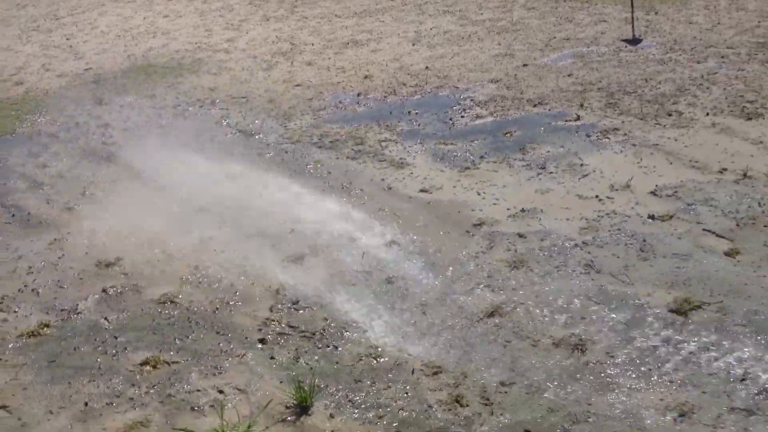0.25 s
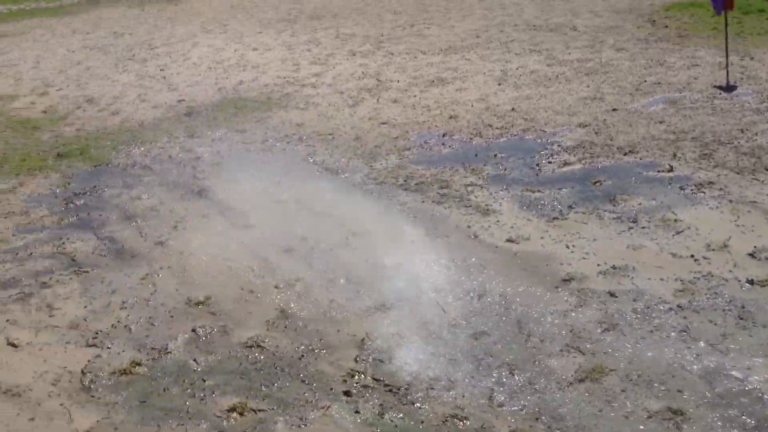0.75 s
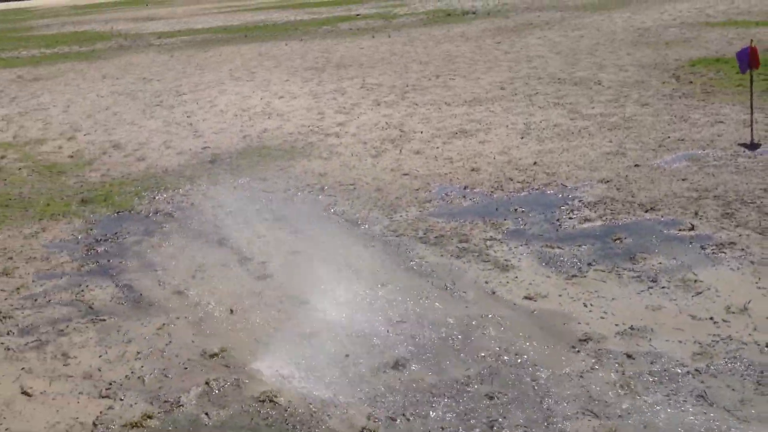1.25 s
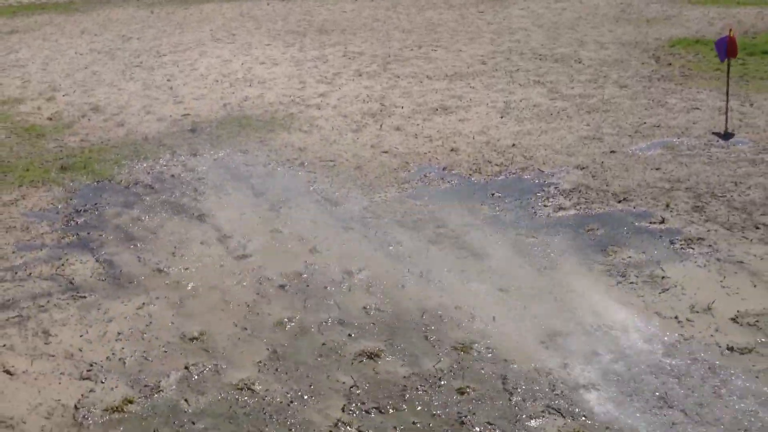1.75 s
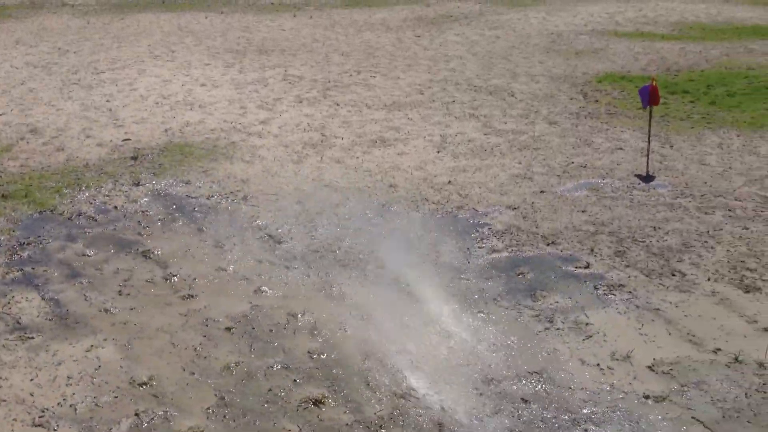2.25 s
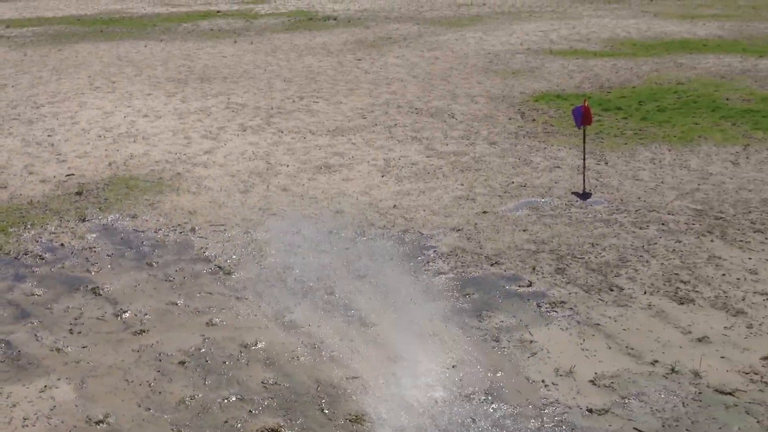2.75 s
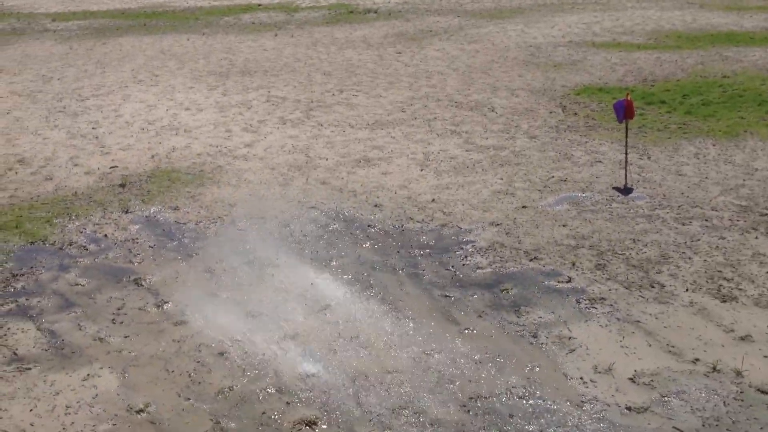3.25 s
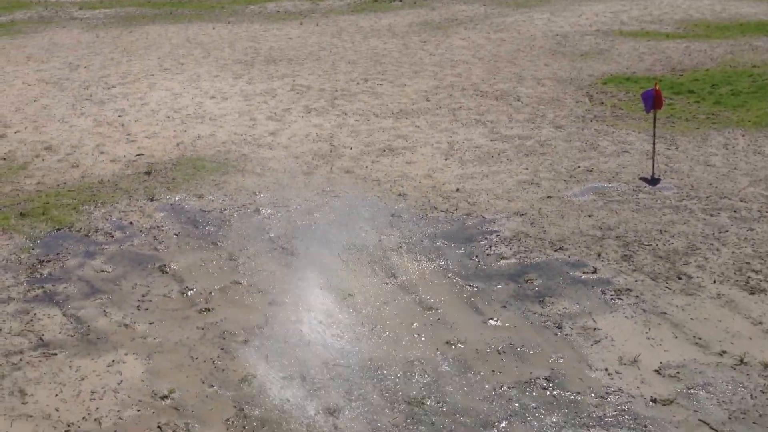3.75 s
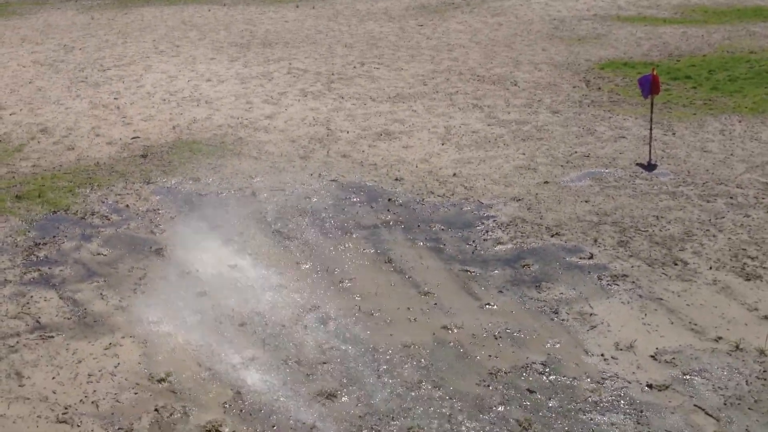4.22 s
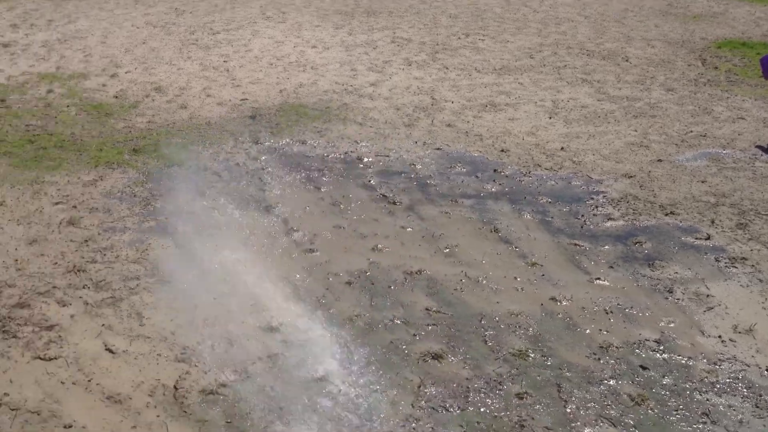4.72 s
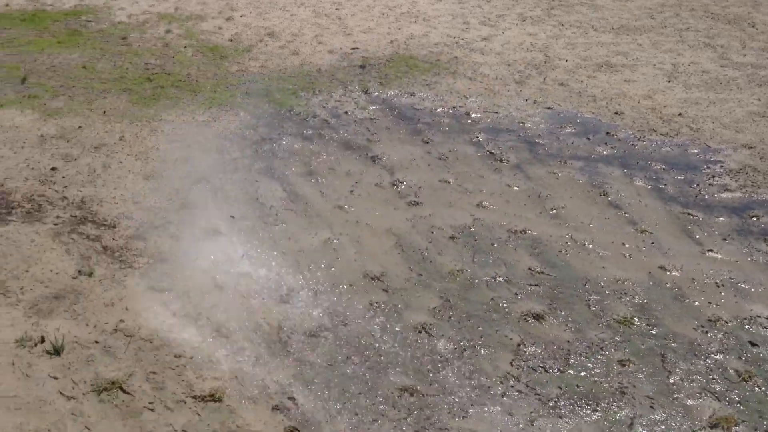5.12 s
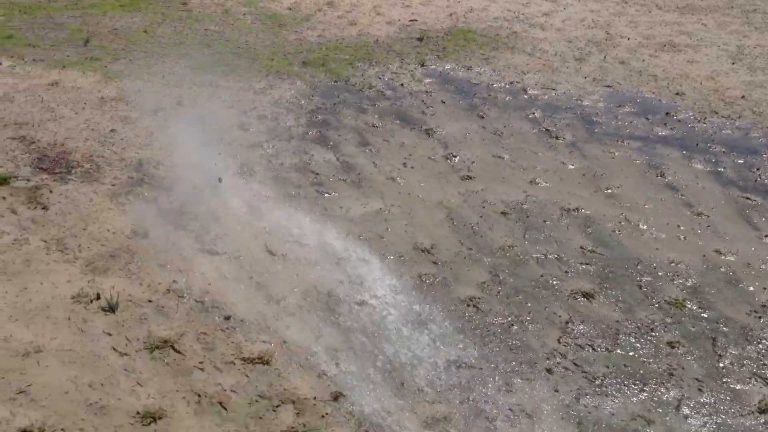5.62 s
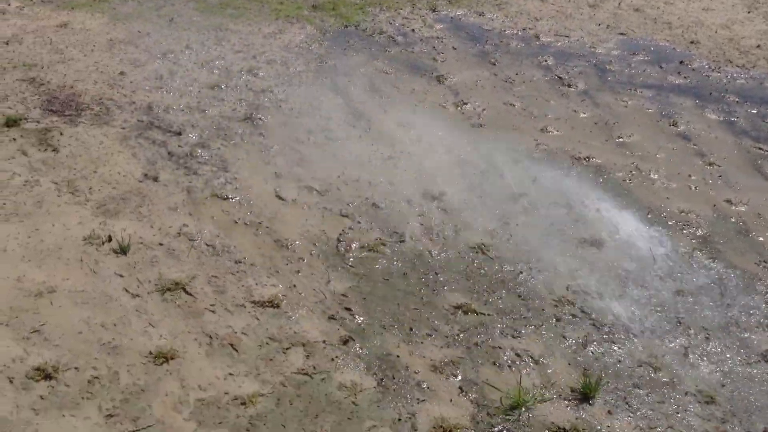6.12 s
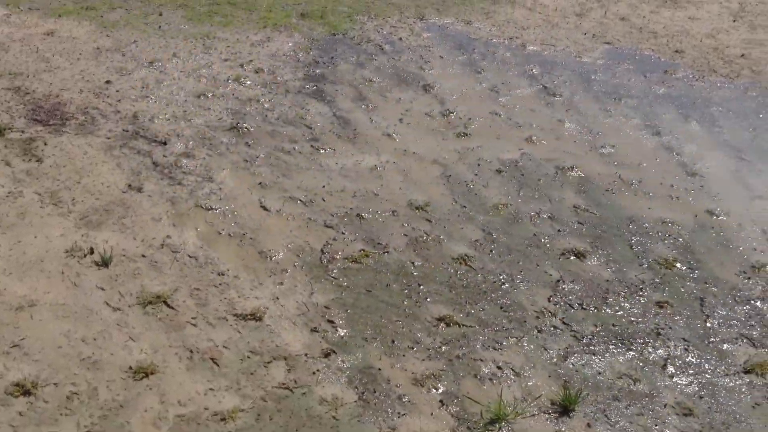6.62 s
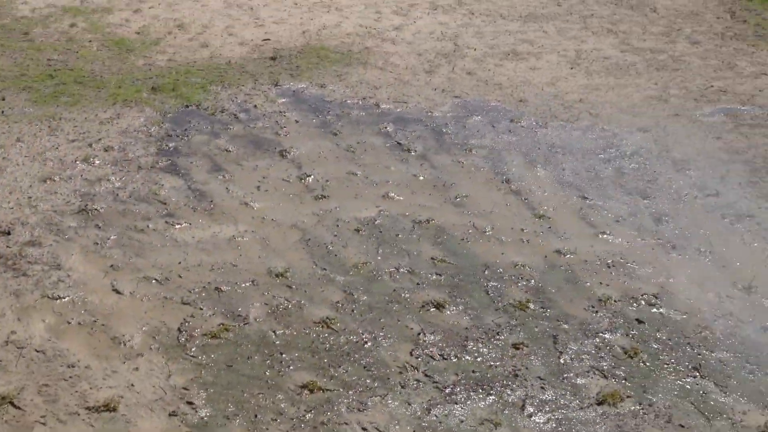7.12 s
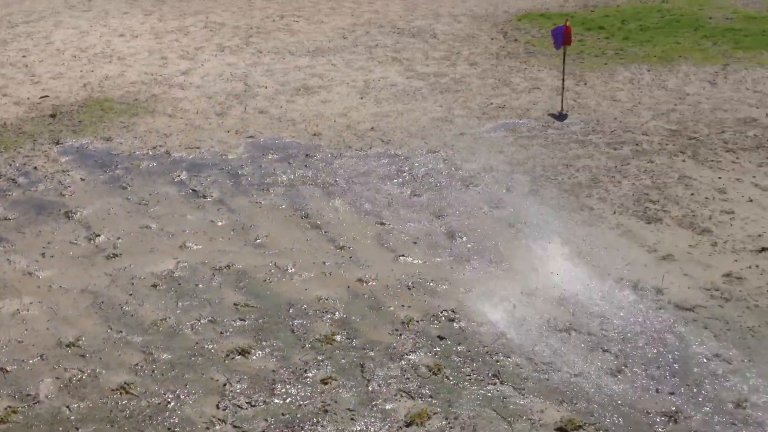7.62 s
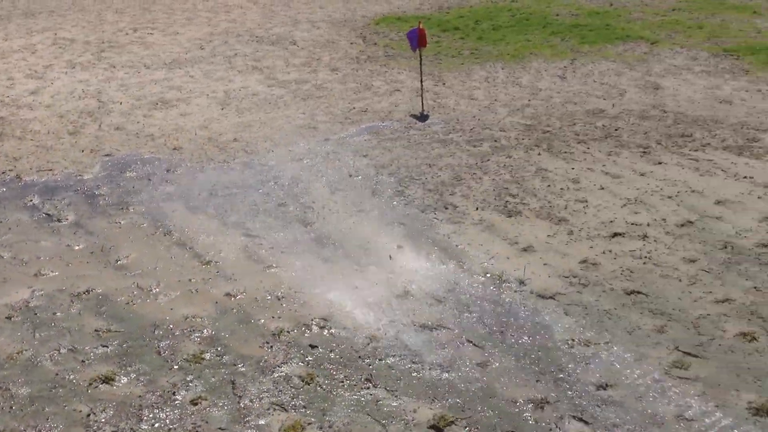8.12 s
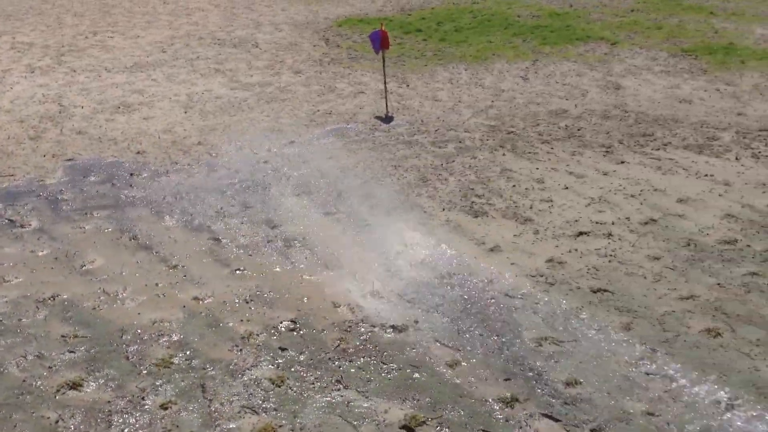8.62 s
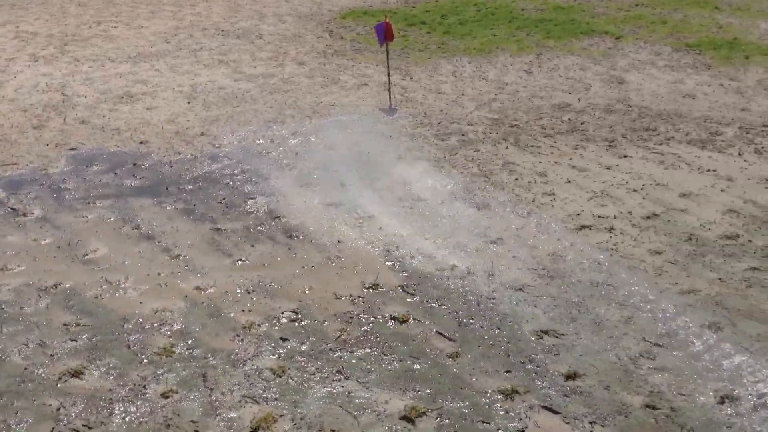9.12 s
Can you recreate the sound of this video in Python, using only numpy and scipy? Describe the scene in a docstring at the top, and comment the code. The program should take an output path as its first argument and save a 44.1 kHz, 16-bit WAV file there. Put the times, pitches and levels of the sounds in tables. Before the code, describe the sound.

A hand-swept air jet blasts sand off the ground with a throbbing, gritty hiss while wind thumps on the microphone.

```python
"""Jet blasting rough ground

A fast jet, swept by hand in front of a small camera, blasts sand and spray off the ground. Its gritty hiss
throbs a few times a second and changes colour with its bearing from the microphone. A steadier low rush
of air lies under it, and right at the microphone a breeze buffets the port with dull thumps."""
import sys
import numpy as np
from scipy import signal
from scipy.fft import rfft, irfft, next_fast_len
from scipy.io import wavfile
from scipy.ndimage import uniform_filter1d, map_coordinates

SR = 44100
rng = np.random.default_rng(int(sys.argv[2]) if len(sys.argv) > 2 else 0)


def materialize(psi):
    """Save the field psi as 16-bit PCM at rate SR to the path in sys.argv[1].

    A 1-D psi becomes a single channel; in a 2-D psi each row is a channel.
    """
    bounded = np.clip(np.atleast_2d(psi).T, -1, 1)
    quanta = np.round(bounded * 32767).astype(np.int16)
    wavfile.write(sys.argv[1], SR, quanta)


N = 412776

# The jet between surges; fizz is its treble, body its mid-range.
# Each row: time in seconds, fizz level in dB, body over fizz in dB.
JET_LEVELS = [(0, -30.5, -6.5), (0.82, -30.5, -9), (1.39, -32.5, -10.5), (1.57, -27.5, -7),
              (2.04, -28.5, -9.5), (2.89, -31.0, -10.5), (4.64, -29.5, -9), (5.63, -34.5, -10),
              (5.84, -27, -5.5), (6.43, -32.5, -8.3), (6.63, -28, -8), (6.99, -28.5, -12.5),
              (7.24, -25.4, -12.5), (7.55, -28.5, -14.5), (7.64, -28.5, -9.0), (8.46, -30, -10.5),
              (9.36, -30.4, -8.5)]
# Throbs of the flow, often a quarter second apart.
# Each row: peak time in seconds, fizz rise in dB, body rise over fizz rise in dB.
JET_SURGES = [(0.122, 5, -3), (0.345, 5.5, -2.5), (0.579, 4.9, -2.4), (0.771, 3.5, -0.8),
              (0.994, 4.2, -0.5), (1.231, 5.5, 0.5), (1.436, 6.2, -1), (1.692, 1, -1), (2.448, 1, -1.5),
              (2.769, 3, -0.7), (3.433, 1.7, 0.7), (4.141, 1, -2.5), (4.345, 1, -0.4), (4.791, 3.5, 1.9),
              (5.046, 4, 0.2), (5.26, 3.5, 1.5), (5.473, 5.3, 0.5), (5.691, 4.2, 2), (5.92, 1.5, -4),
              (6.536, 4.5, -2.3), (6.844, 3, -0.2), (7.106, 5, 1), (7.359, 3, -0.5), (7.503, 4.8, 6),
              (7.854, 3.5, 0), (8.092, 4.5, -0.5), (8.301, 2.2, 1), (8.592, 3.5, 1.6), (9.295, 1.5, 0.5)]
# Where the jet strikes. Each row: time in seconds, bearing from the microphone (-1 left, 0 ahead, 1 right).
JET_BEARING = [(0, -.8), (.4, -1), (1.25, -1.35), (1.5, .17), (1.8, 0.64), (2.2, 0.4), (3.3, .15),
               (4.2, .17), (5.1, -0.13), (5.45, -0.36), (6, 0.31), (6.65, 0.91), (7.45, 0.89), (7.8, .12),
               (8.7, 0.059), (9.36, 0.35)]
# The jet's tone at the microphone. Each row: frequency in Hz, relative dB from the left, ahead, the right.
JET_COLOUR = [(700, -6, -3.5, -6), (1270, -10.5, -9, -15.5), (2240, -6, -5, -7.5), (2950, -5, -6, -9.5),
              (3440, -7.5, -6, -16.5), (4300, -8.5, -5, -20), (4800, -8.5, -3.5, -16.5),
              (5660, -11.5, -7.5, -20.5), (6500, -7, -4.5, -8), (8100, -1.5, 0.5, 1), (9970, -4, -2, -8),
              (10400, -3.5, -2.5, -7.5), (12100, -0.5, -1, -10), (13500, -5, -5.5, -2),
              (15000, -9, -6, -1.5)]
# Clods of sand torn loose. Each row: start in seconds, strength in dB relative to the blast.
CLODS = [(1.921, 3), (2.7914, 5), (4.8988, 5.5), (5.0814, 7), (5.1004, 7), (5.1134, 5), (5.298, 4),
         (5.3054, 7.5), (5.675, 2), (6.8578, 3.5), (7.1142, 6), (7.5138, 5), (8.1485, 8.5), (8.302, 3)]
# The low rush. Each row: time in seconds, level in dB.
RUSH_LEVELS = [(0, -40), (2.3, -40.5), (3.4, -42), (6.2, -40.5), (7.0, -41.5), (7.35, -38), (7.6, -41),
               (9.36, -45)]
# Its tone. Each row: frequency in Hz, relative level in dB.
RUSH_SPECTRUM = [(30, -75), (110, -28), (200, -9.5), (330, -8.5), (520, -13.5), (900, -12), (1500, -10),
                 (3000, -20)]
# Buffeting between thumps. Each row: time in seconds, level in dB.
BREEZE_LEVELS = [(0, -45), (.38, -45.5), (.5, -54), (1.35, -58.5), (2.0, -54), (2.4, -51), (2.8, -64),
                 (3.2, -54), (3.7, -53), (4.22, -59), (4.4, -49), (4.85, -43), (5.7, -44.5), (6.1, -56),
                 (6.75, -54), (7.0, -63), (7.6, -57), (8.2, -46), (8.45, -50.5), (9.15, -42.5), (9.36, -43)]
# The tone of wind at the microphone port. Each row: frequency in Hz, relative level in dB.
PORT_SPECTRUM = [(20, -70), (50, -11.5), (130, 1.5), (200, 1.5), (300, -4.5), (500, -16), (1000, -31),
                 (2500, -80)]
# Eddies striking the port. Each row: time in seconds, level in dB, pitch in Hz.
EDDIES = [(.011, -31.5, 207), (.192, -30, 168), (.294, -28, 183), (.34, -31, 215), (.384, -33, 220),
          (.409, -27, 194), (1.996, -34, 146), (2.383, -30, 162), (2.989, -29, 205), (3.005, -26, 150),
          (3.031, -26, 205), (3.059, -31, 183), (3.098, -28, 200), (3.413, -15.5, 278), (3.48, -30, 146),
          (3.613, -27, 196), (4.407, -25.5, 188), (4.422, -27.5, 165), (4.563, -20, 201),
          (4.589, -25.5, 218), (4.608, -27, 170), (4.642, -23, 181), (5.092, -26.5, 175),
          (5.128, -28.5, 185), (5.151, -26.5, 190), (5.194, -25.5, 180), (5.209, -24.5, 185),
          (5.333, -28, 162), (5.358, -26, 175), (5.591, -25.5, 174), (5.622, -25, 163), (5.694, -24, 178),
          (5.827, -30, 215), (6.187, -32.5, 172), (6.733, -31, 175), (8.166, -27.5, 168),
          (8.622, -21.5, 238), (8.673, -26, 240), (8.69, -22, 170), (8.734, -16.5, 267), (8.87, -30, 220),
          (8.957, -17, 190), (8.976, -14.5, 238), (8.997, -11.5, 248), (9.012, -20.5, 308),
          (9.1, -21.5, 190), (9.116, -16.5, 245), (9.315, -28.5, 220)]

SURGE_RISE_S, SURGE_FALL_S = 0.07, 0.079
EDDY_MS, EDDY_HZ, EDDY_DB = 8.9, 185, -27  # an eddy's length at this pitch and level
PITCH_EXPONENT, SHORTENING_PER_DB = 0.96, 0.038  # higher and stronger eddies are shorter
FAINT_OVER_BREEZE_DB, FAINT_SPREAD_DB = 10.5, 3
TOP_HZ = 15290  # the camera's band limit


def jet():
    """Turbulent noise and grit in front of the microphone, flickering and patchy in time and pitch."""
    flicker = amp(0.67 * wobble(400) + 0.41 * wobble(90) + 0.36 * wobble(25))
    gritty_noise = rng.standard_normal(N) + 0.39 * grit(per_second=1500, spread_db=4, top_db=16)
    blast = unit(flicker * gritty_noise) + clods()
    hz, t, spectrum = signal.stft(blast, SR, nperseg=256)
    patches = uniform_filter1d(rng.standard_normal(spectrum.shape), size=9, axis=0)
    patches = uniform_filter1d(patches, size=20, axis=1)
    colour = bearing_colour(hz, t)
    fizz_db, body_over_db = flow(t)
    # The flow sets the level of each band, whatever the bearing.
    fizz, body = (hz > 5500) & (hz < TOP_HZ), (hz > 1300) & (hz < 4000)
    rms = lambda band: np.sqrt(np.sum(colour[band] ** 2, axis=0) / len(hz))
    body_share = along([(4000, 0.62), (5600, 0)], hz)[:, None]
    balance = (amp(body_over_db) / rms(body)) ** body_share / rms(fizz) ** (1 - body_share)
    level = amp(fizz_db + 0.82 * unit(patches))
    return signal.istft(spectrum * colour * balance * level, SR, nperseg=256)[1][:N]


def flow(t):
    """Fizz level and body over fizz in dB at times t: the slow sweep plus a swell for each surge."""
    s, fizz_db, body_over_db = np.transpose(JET_LEVELS)
    peak_s, *rise_db = np.transpose(JET_SURGES)
    since_peak = t - peak_s[:, None]
    width_s = np.where(since_peak < 0, SURGE_RISE_S, SURGE_FALL_S)
    fizz_swell, body_swell = np.array(rise_db) @ np.exp(-(since_peak / width_s) ** 2)
    return np.interp(t, s, fizz_db) + fizz_swell, np.interp(t, s, body_over_db) + body_swell


def bearing_colour(hz, t):
    """Gain by frequency and time as the jet swings across the microphone; a small jet makes little bass."""
    table = np.array(JET_COLOUR, float)
    left, ahead, right = (along(table[:, [0, k]], hz)[:, None] for k in (1, 2, 3))
    bearing = curve(JET_BEARING, t)
    colour_db = ahead + np.maximum(-bearing, 0) * (left - ahead) + np.maximum(bearing, 0) * (right - ahead)
    bass_cut_db = along([(100, -60), (350, -24.5), (900, -5.5), (1600, 1.0)], hz)[:, None]
    return amp(colour_db + bass_cut_db)


def grit(per_second, spread_db, top_db):
    """Sand grains and droplets hitting the ground: clicks of many sizes up to a largest one."""
    at, size, polarity = rng.random((3, int(per_second * N / SR)))
    size_db = np.minimum(-spread_db * np.log(size), top_db)
    return unit(np.bincount((at * N).astype(int), amp(size_db) * np.sign(polarity - 0.5), N))


def clods():
    """Each clod of sand bursts as a few milliseconds of rattling mid-range noise."""
    t, bursts = np.arange(SR // 20) / SR, np.zeros(N + SR)
    for s, db in CLODS:
        attack = 1 - np.exp(-t / 0.0017)
        bursts[round(s * SR):][:len(t)] += attack * amp(db - 60 * t / 0.036)
    rattle = amp(4.5 * wobble(500)) * rng.standard_normal(N)
    return bursts[:N] * coloured(rattle, [(800, -6), (2000, 1), (5000, 3.0), (10000, -13)])


def rush():
    """Smooth low noise of the moving air, under the jet."""
    noise = coloured(rng.standard_normal(N), RUSH_SPECTRUM)
    return amp(curve(RUSH_LEVELS) + 1.37 * wobble(8)) * noise


def breeze():
    """Wind right on the microphone port: a lumpy rumble with thumps on top."""
    lumps = amp(0.9 * wobble(12) + 2.9 * wobble(45)) * rng.standard_normal(N)
    rumble = amp(curve(BREEZE_LEVELS)) * coloured(lumps, PORT_SPECTRUM)
    return rumble + eddy_thumps(EDDIES + faint_eddies(count=50))


def eddy_thumps(rows):
    """Each eddy strikes the port as one or two low swings and trails a wake; strong ones crack."""
    lead = SR // 10
    t = np.arange(-lead, lead) / SR
    thumps, wakes = np.zeros((2, N + SR))
    for (s, db, hz), (swing_phase, crack_phase) in zip(rows, rng.random((len(rows), 2))):
        ms = EDDY_MS * (EDDY_HZ / hz) ** PITCH_EXPONENT * np.exp(-SHORTENING_PER_DB * (db - EDDY_DB))
        envelope = np.exp(-np.abs(2600 * t / ms / np.where(t < 0, 1, 1.6)) ** 1.85)  # slower to fall
        swing = np.cos(2 * np.pi * (hz * t * (1 - 8 * t) + swing_phase))  # pitch sags as the eddy passes
        crack = np.exp(-np.abs(t / 0.00083) ** 1.4) * np.cos(2 * np.pi * (2.4 * hz * t + crack_phase))
        wake = np.exp(-np.abs(t) / np.where(t < 0, 0.006, 0.016))
        thumps[round(s * SR):][:len(t)] += amp(db) * envelope * swing + amp(1.86 * db + 5.0) * crack
        wakes[round(s * SR):][:len(t)] += amp(db - 13.5) * wake
    swirl = coloured(rng.standard_normal(N), PORT_SPECTRUM)
    pressure = thumps[lead:][:N] + wakes[lead:][:N] * swirl
    return filtered(pressure, lambda hz: hz ** 4 / (hz ** 4 + 75 ** 4))  # the port passes no slow pressure


def faint_eddies(count):
    """Rows like EDDIES at chance moments, as strong as the breeze allows."""
    at, size, pitch = rng.random((count, 3)).T
    s = at * N / SR
    db = curve(BREEZE_LEVELS, s) + FAINT_OVER_BREEZE_DB + FAINT_SPREAD_DB * (2 * size - 1)
    return list(zip(s, db, EDDY_HZ * (0.73 + 0.45 * pitch)))


def amp(db):
    """Gain of a level in dB."""
    return 10 ** (np.asarray(db) / 20)


def unit(x):
    """x scaled to rms 1."""
    return x / np.sqrt(np.mean(x ** 2) + 1e-20)


def along(points, hz):
    """(Hz, value) points read on a log axis."""
    point_hz, values = np.transpose(points)
    return np.interp(np.log(hz + 1), np.log(point_hz + 1), values)


def curve(rows, t=None):
    """A (seconds, value) curve at times t, or at every sample."""
    return np.interp(np.arange(N) / SR if t is None else t, *np.transpose(rows))


def wobble(rate):
    """A smooth random curve, rate knots a second."""
    return map_coordinates(rng.standard_normal(int(N * rate / SR) + 4), [np.arange(N) * rate / SR])


def filtered(x, response):
    """x through a filter whose gain is response(hz)."""
    size = next_fast_len(N + 8192)
    return irfft(rfft(x, size) * response(np.fft.rfftfreq(size, 1 / SR)), size)[..., :N]


def coloured(noise, points):
    """Noise shaped by (Hz, dB) points, at rms 1."""
    return unit(filtered(noise, lambda hz: amp(along(points, hz))))


def scene():
    """Jet, rush and breeze at one microphone."""
    return (jet() + rush() + breeze())[None]


def record(dry):
    """The camera cuts the deep bass and keeps nothing above its band limit."""
    return filtered(dry, lambda hz: hz ** 2 / (hz ** 2 + 55 ** 2) * (hz < TOP_HZ))


dry = scene()
out = record(dry)
materialize(out)
```